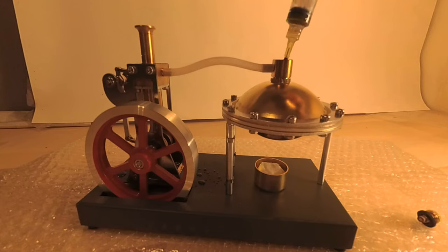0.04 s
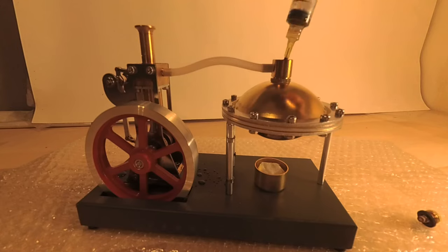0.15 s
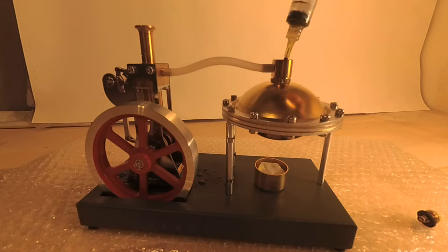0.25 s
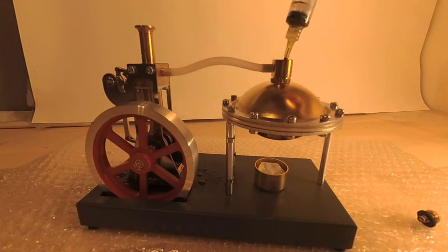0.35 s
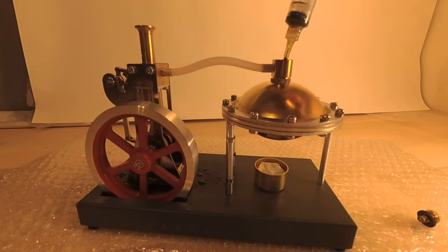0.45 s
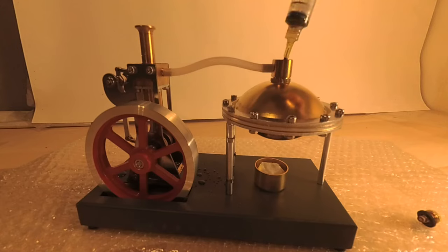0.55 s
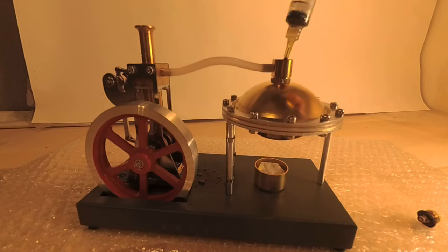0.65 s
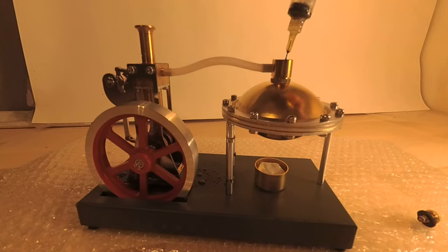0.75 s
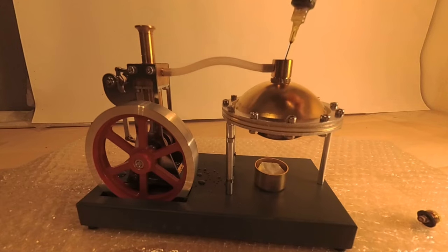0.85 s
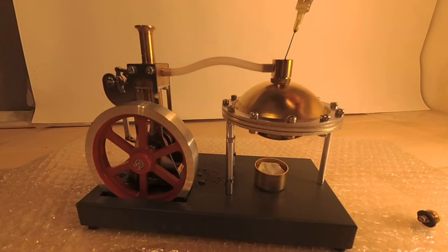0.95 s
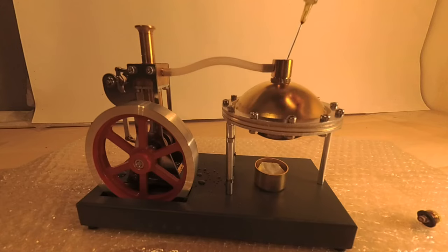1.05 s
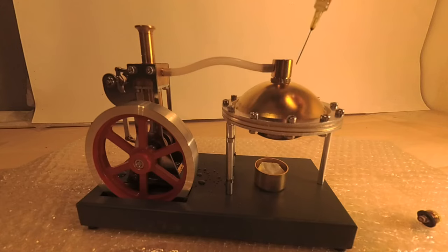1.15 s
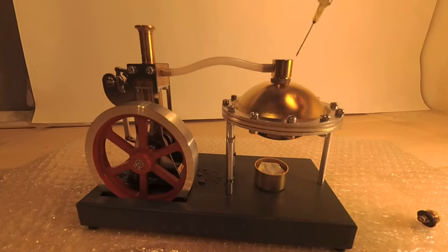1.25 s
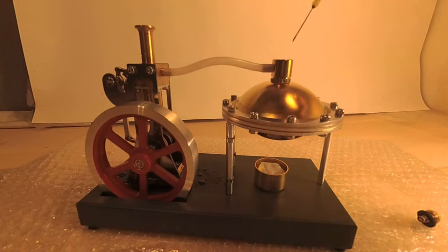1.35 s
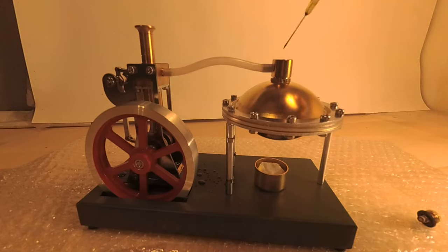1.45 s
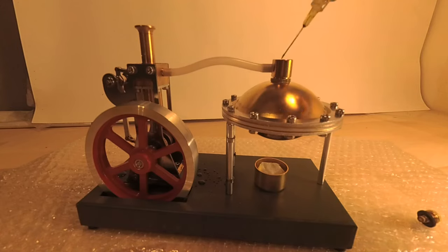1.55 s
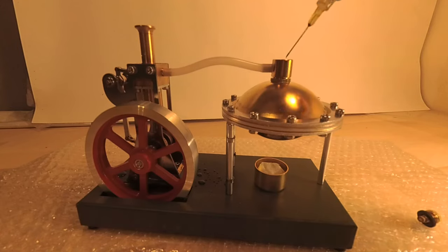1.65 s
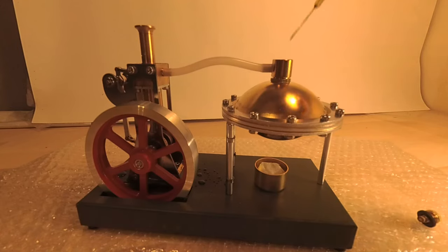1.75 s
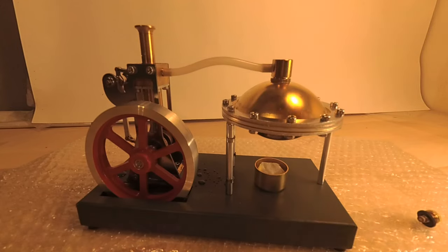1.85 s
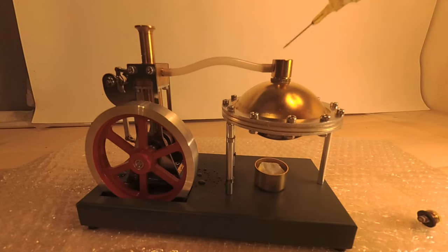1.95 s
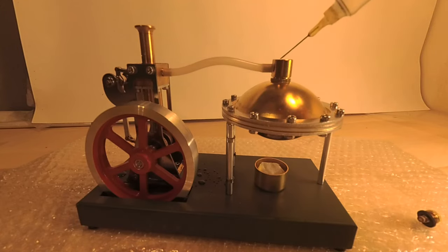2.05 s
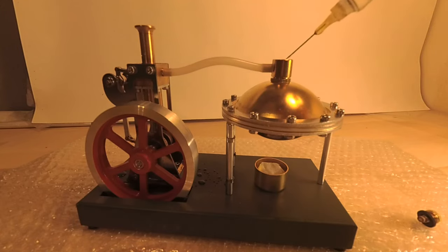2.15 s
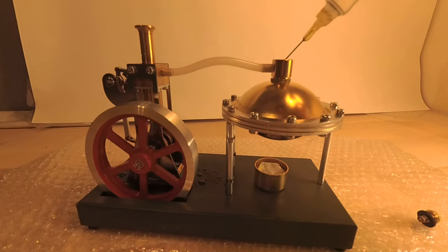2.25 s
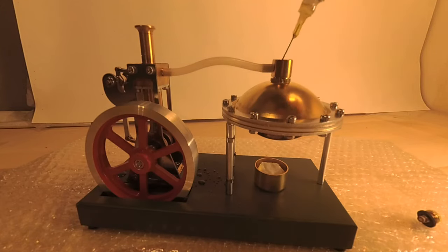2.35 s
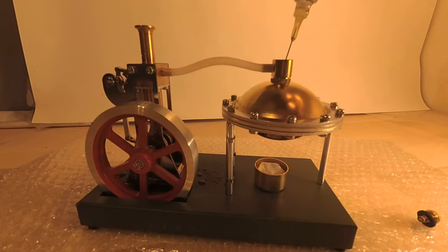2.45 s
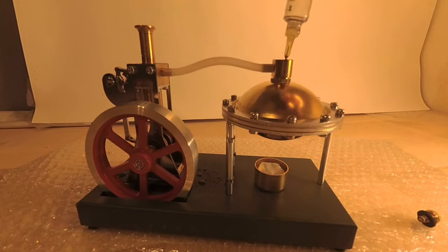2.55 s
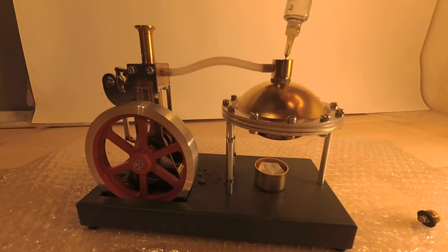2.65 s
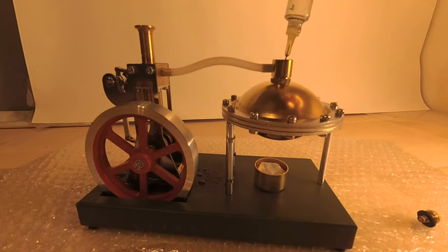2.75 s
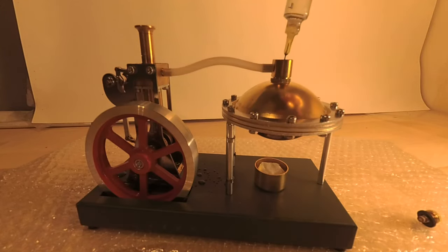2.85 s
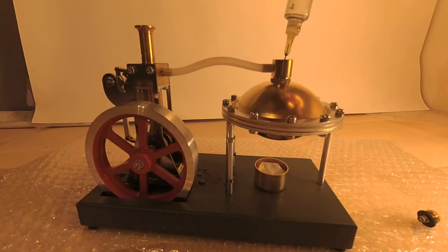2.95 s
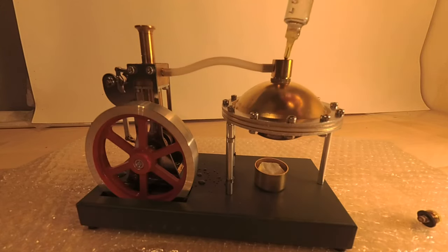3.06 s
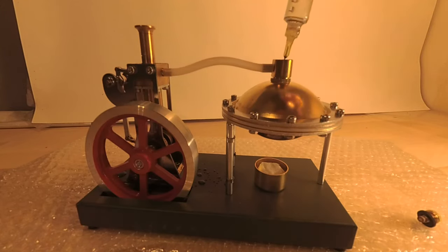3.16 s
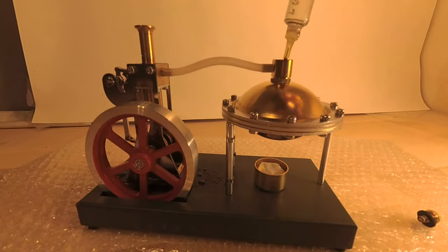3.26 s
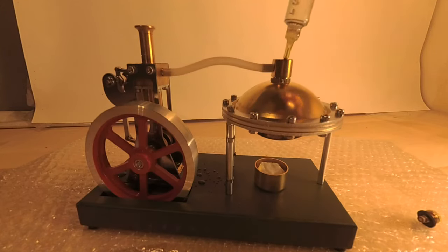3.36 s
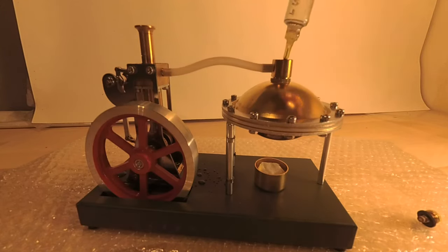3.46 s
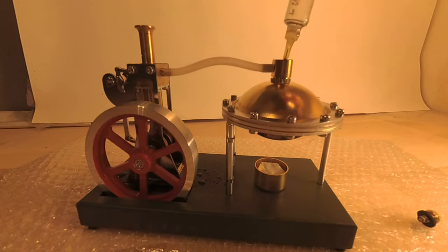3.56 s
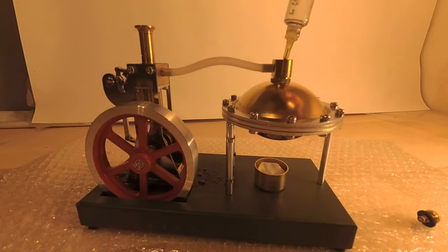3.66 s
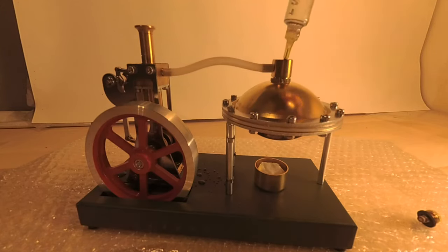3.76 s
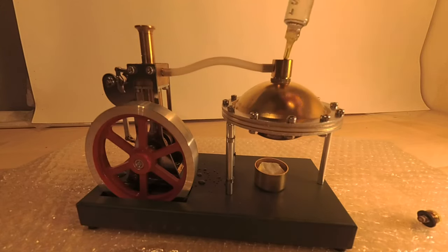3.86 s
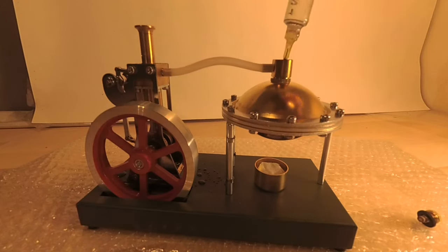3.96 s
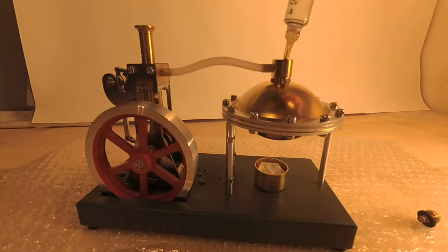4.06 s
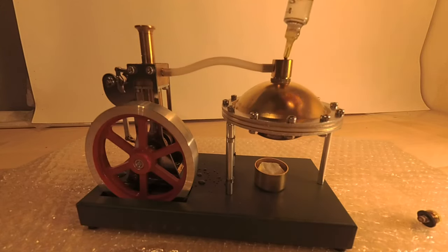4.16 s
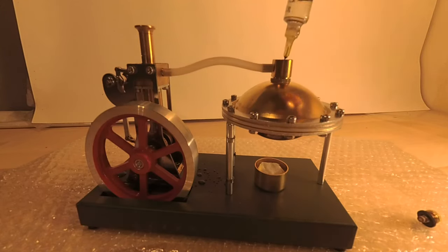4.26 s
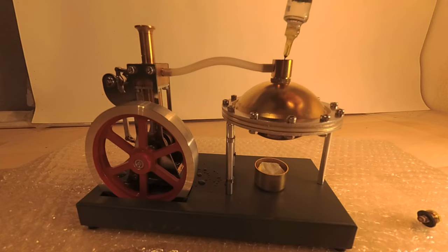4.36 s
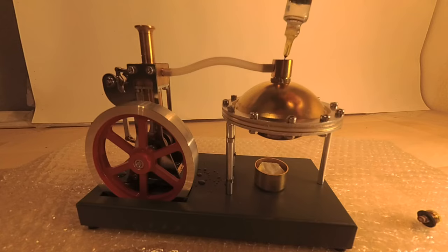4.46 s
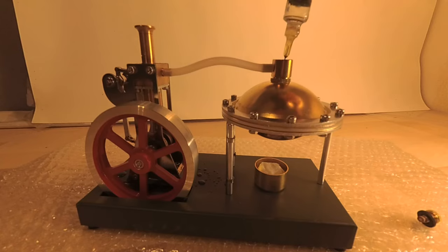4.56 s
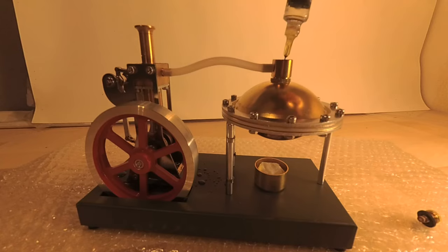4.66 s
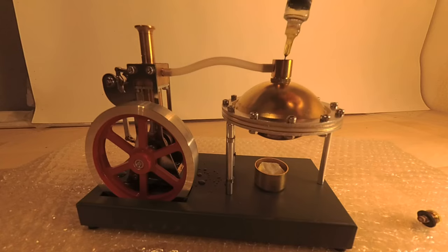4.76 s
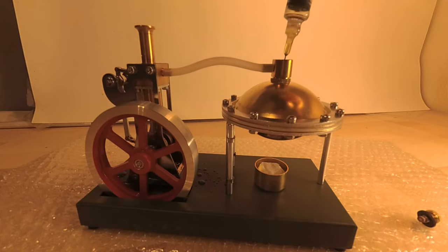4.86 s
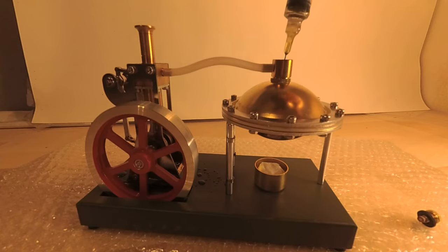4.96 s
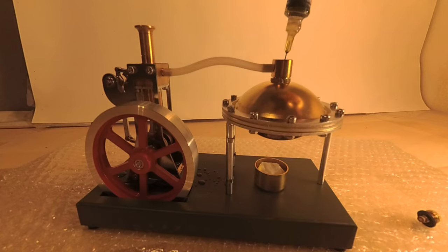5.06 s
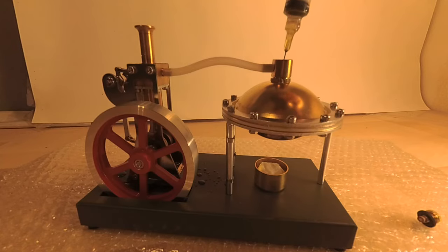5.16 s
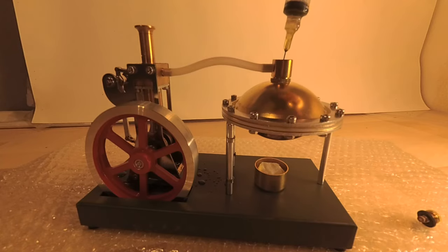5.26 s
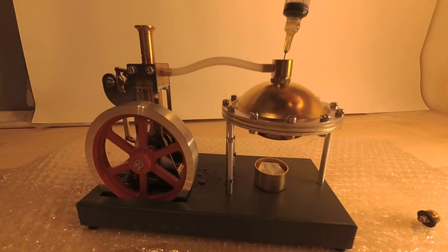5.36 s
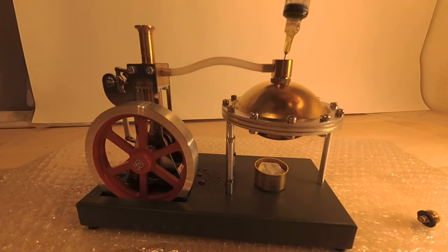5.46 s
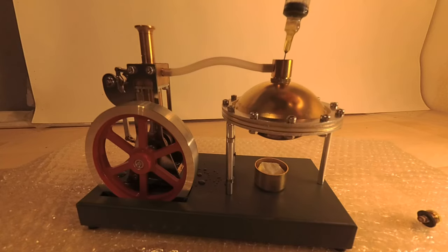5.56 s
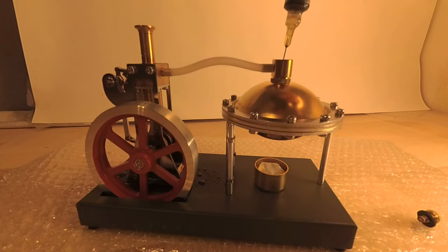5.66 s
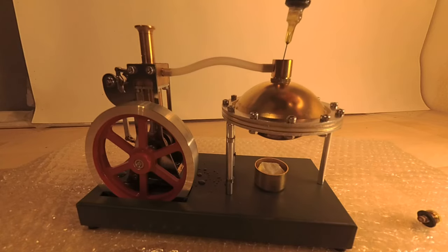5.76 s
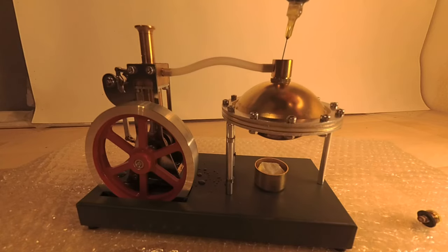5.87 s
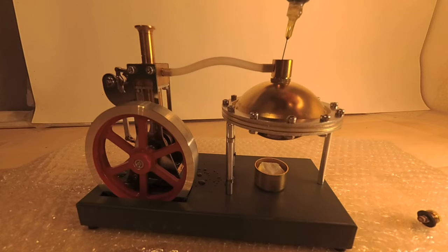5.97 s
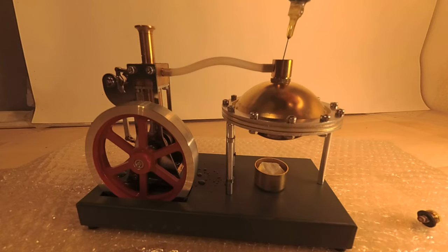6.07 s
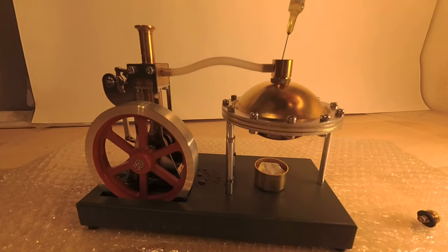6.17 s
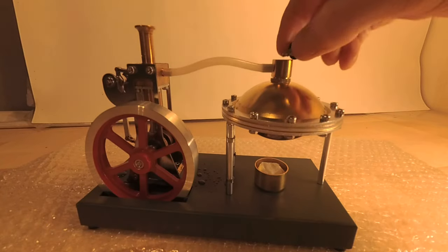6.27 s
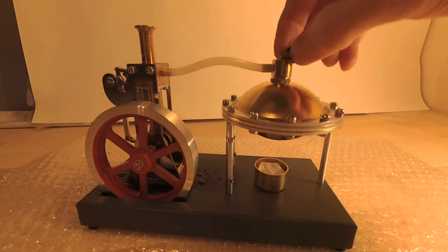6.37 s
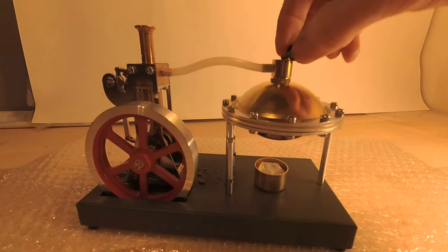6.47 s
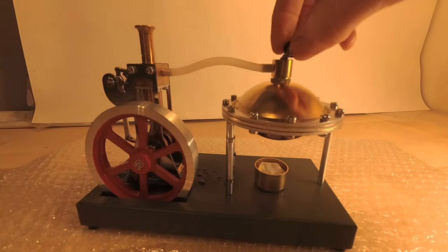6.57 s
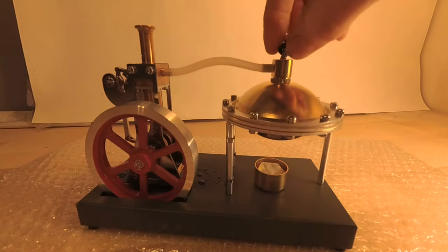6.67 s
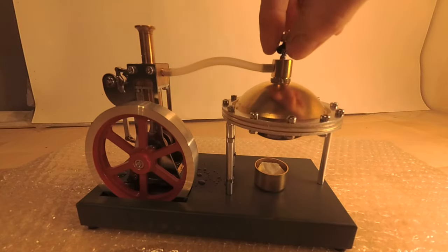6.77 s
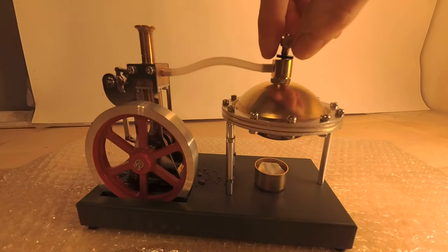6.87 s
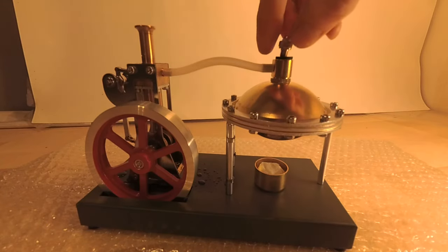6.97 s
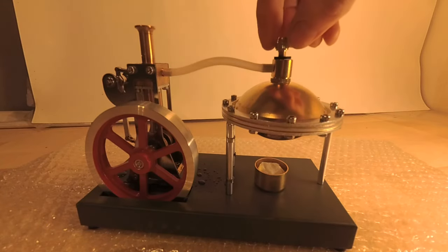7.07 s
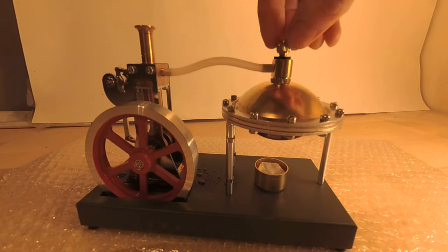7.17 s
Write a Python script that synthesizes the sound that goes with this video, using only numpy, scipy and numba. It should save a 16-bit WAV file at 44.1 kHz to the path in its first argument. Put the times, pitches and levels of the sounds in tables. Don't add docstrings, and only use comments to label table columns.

```python
import sys
import numpy as np
from scipy import signal
from scipy.fft import rfft, irfft
from scipy.io import wavfile
from scipy.ndimage import uniform_filter1d, minimum_filter1d
from numba import njit

SR = 44100
rng = np.random.default_rng(int(sys.argv[2]) if len(sys.argv) > 2 else 0)


def ratio_of_db(decibels):
    return 10 ** (np.asarray(decibels, float) / 20)


def pcm_store(signal):
    levels = np.round(np.clip(np.atleast_2d(signal), -1, 1) * 32767)
    wavfile.write(sys.argv[1], SR, levels.astype(np.int16).T)


N = 318181
T = np.arange(N) / SR

# [f/Hz, width/Hz, level/dB]
NECK_MODES = [(649, 15, 2), (562, 44.4, -10), (489, 39, -16), (717.6, 30, -17.5)]
# [f/Hz, width/Hz, level/dB]
SHELL_MODES = [(986.8, 16.5, -2), (1071.5, 69, -5), (1105, 34, 0), (1162, 33.4, 0), (1246, 34, -13),
               (818, 44, -23.5)]
# [f/Hz, width/Hz, level/dB]
UPPER_MODES = [(1443, 11, -9.5), (1662, 17, -3.5), (1792, 36, 3), (1904, 11.2, 4.5), (1964, 29, 0.5),
               (2127, 30.4, -0.5), (2460, 65, -8), (2598, 25, -8.5), (2930, 27, -9)]
# [f/Hz, width/Hz, level/dB]
NOZZLE_BANDS = [(15190, 2200, 1.5), (13600, 2000, -6.5)]


def level(x, db=0):
    return x * ratio_of_db(db) / np.sqrt(np.mean(x ** 2))


@njit
def svf(x, hz, width):
    y, b, l, g, k = np.empty(len(x)), 0., 0., 0., 0.
    for i in range(len(x)):
        if i % 16 == 0:
            g, k = np.tan(np.pi * hz[i] / SR), width / hz[i]
        v = (b + g * (x[i] - l)) / (1 + g * (g + k))
        b, l, y[i] = 2 * v - b, l + 2 * g * v, k * v
    return y


def ring(x, modes, bend=1, vary_db=0):
    gain = ratio_of_db(vary_db * rng.standard_normal(len(modes)))
    pitch = np.ones(len(x)) * bend
    out = 0
    for k, (hz, width, db) in enumerate(modes):
        out = out + (-1) ** k * gain[k] * ratio_of_db(db) * svf(x, hz * pitch, 1. * width)
    return out


def walk(rate):
    hold = int(SR / rate)
    steps = np.repeat(rng.standard_normal(N // hold + 1), hold)
    return 0.57 * uniform_filter1d(uniform_filter1d(steps, hold), hold)[:N]


def add(out, s, x, db):
    i = int(s * SR)
    out[i:i + len(x)] += (x * ratio_of_db(db) / np.abs(x).max())[:N - i]


def burst(t60, crackle_db, click=4.76, size=8000):
    t = np.arange(size) / SR
    grains = ratio_of_db(crackle_db * np.repeat(rng.standard_normal(size // 20), 20))
    force = rng.standard_normal(size) * grains * np.exp(-np.log(1000) * t / max(t60, .002))
    force[0] = click
    return force


def droplets(flicker_db, rate, grain_db):
    return rng.standard_normal(N) * ratio_of_db(flicker_db * walk(rate) + grain_db * walk(400))


def plunger():
    # [t/s, flow/dB, aim/dB]
    presses = [
        [(0.0, -58, -7), (0.1, -57.5, -5), (0.14, -56.5, -6.5), (0.27, -53.5, -6), (0.3, -55, -3),
         (0.352, -56.5, -5), (0.396, -83, 4)],
        [(2.6, -63, -9), (2.67, -52.5, 2.5), (2.87, -50, -6), (3.1, -52, -1), (3.3, -55, 3), (3.55, -52, -1.5),
         (4.65, -54, -0.5), (5.37, -53.5, 0), (5.415, -65, -8)],
    ]
    flow, aim = np.full(N, -200.), np.zeros(N)
    for s, flow_db, aim_db in map(np.transpose, presses):
        on = (T >= s[0]) & (T <= s[-1])
        flow[on] = np.interp(T[on], s, flow_db)
        aim[on] = np.interp(T[on], s, aim_db)
    return flow, aim


def nozzle_hiss(drops, fill):
    # [f/Hz, width/Hz, level/dB]
    nozzle_low = [(11140, 240, -20.5), (12750, 2170, -6)]
    thinning = ratio_of_db(-1.5 * (T - 4.0) * (T > 1))
    return level(ring(drops, NOZZLE_BANDS) + thinning * ring(drops, nozzle_low, fill))


def spray(drops, fill):
    # [f empty/Hz, width/Hz, level/dB]
    air_modes = [(5500, 680, -14.5), (6440, 400, -9.5), (7970, 440, 1.5), (8800, 480, -6.5),
                 (10180, 480, 1.5), (2650, 1300, -0.5)]
    mist = ring(droplets(3.4, 33, 0.64), [(7100, 23000, 0)])
    ridge = level(ring(drops, [(6680, 140, 0)]), -10.5) * ratio_of_db(2.5 * (T - 4))
    return level(ring(drops, air_modes, fill)) + level(mist, -1.1) + ridge


def shell_drum(fill):
    drum = droplets(1.2, 30, 1.8)
    lowest = ratio_of_db(0.5 * (T + 2.5) * (T > 1)) * ring(drum, SHELL_MODES[:1])
    others = ring(drum, SHELL_MODES[1:], (fill / 1.042) ** -0.2)
    upper = level(ring(drum, UPPER_MODES, 1 + 0.0396 * (T < 1)), -10.0)
    return level(lowest - others) + upper * ratio_of_db(10.3 * (T < 1) + 3.1 * (T > 4.14))


def spits(out):
    # [t/s, peak level/dB]
    spit_times = [(0.0308, -41), (0.2114, -24), (0.2922, -16), (2.6656, -19.5), (3.1222, -25),
                  (3.445, -21.5), (3.5213, -24), (3.5732, -41), (3.8027, -27), (4.198, -22.5),
                  (4.2265, -24), (4.4023, -24), (4.511, -39), (4.7386, -26), (4.9441, -29), (4.999, -24),
                  (5.0613, -27), (5.198, -24)]
    for s, db in spit_times:
        spit = ring(burst(0.068, crackle_db=-5.5), NOZZLE_BANDS + [(8060, 2100, -13.5)])
        add(out, s, spit, db - 14.5)


def jet():
    # [t/s, pitch factor]
    filling = [
        (0, 1.01),
        (2.6, 0.96),
        (5.4, 1.077),
    ]
    flow, aim = plunger()
    surge_db, surge_per_s = 3.5, 18
    surge = [surge_db * walk(surge_per_s) for _ in range(3)]
    empty_s, gasp_s = (0.373, 6.6), 0.019
    gasp = 7 * sum(np.exp(-((T - s) / gasp_s) ** 2) for s in empty_s)
    fill = np.interp(T, *np.transpose(filling))
    drops = droplets(2.6, 40, 4.6)
    out = ratio_of_db(flow + surge[0]) * nozzle_hiss(drops, fill)
    out += ratio_of_db(flow - 11.5 + gasp + 0.26 * surge[0]) * spray(drops, fill)
    out += ratio_of_db(flow + aim + surge[1]) * shell_drum(fill)
    neck_db = flow + aim - 4 - 0.82 * (T - 5.0) + surge[2]
    out += ratio_of_db(neck_db) * level(ring(droplets(6.2, 24.89, 0.54), NECK_MODES))
    spits(out)
    return out


def splashes():
    # [t/s, peak level/dB, f/Hz]
    early_drops = [
        (0.0447, -71, 1185),
        (0.0763, -67, 1160),
        (0.109, -63, 1180),
        (0.1305, -48.5, 1167),
        (0.18, -55, 1130),
        (0.2476, -45, 1160),
        (0.2959, -52, 1118),
        (0.3264, -49, 1190),
    ]
    # [t/s, peak level/dB, f/Hz]
    late_drops = [(2.6886, -39, 1077), (2.7205, -38, 1174), (2.784, -60, 1234), (2.8103, -51, 1105),
                  (2.864, -59, 1160), (2.9782, -51, 1170), (3.003, -38.5, 1189), (3.0622, -45, 1156),
                  (3.1134, -45, 1168), (3.1373, -35.5, 1197), (3.1743, -41.5, 1102), (3.211, -42, 1090),
                  (3.2943, -46, 1154), (3.3148, -36, 1110), (3.3555, -38, 1087), (3.4405, -40.5, 1234),
                  (3.531, -48, 1180), (3.555, -43, 1080), (3.594, -44.5, 1139), (3.612, -47, 1187),
                  (3.659, -40.5, 1188), (3.6975, -38, 1110), (3.763, -41.5, 1168), (3.7973, -34.5, 993),
                  (3.8336, -38, 958), (3.8666, -55, 1210), (3.8938, -54, 1110), (3.9444, -40, 1073),
                  (3.993, -56, 1150), (4.0335, -47, 1210), (4.0543, -44.5, 1160), (4.09, -39.5, 1144),
                  (4.114, -35.5, 1090), (4.1399, -43, 1057), (4.2027, -40, 1192), (4.2505, -41, 1158),
                  (4.3506, -38.5, 1160), (4.3896, -40, 1144), (4.42, -39.5, 1120), (4.4748, -42.5, 1078),
                  (4.4968, -38, 1110), (4.561, -38, 1137), (4.599, -37.5, 1120), (4.6328, -44, 1010),
                  (4.663, -40.5, 1122), (4.7135, -40.5, 1184), (4.8127, -53, 996), (4.8399, -49, 1080),
                  (4.872, -46, 1150), (4.9327, -54, 1105), (4.9532, -43.5, 1007), (5.0184, -41, 1143),
                  (5.084, -39, 1122), (5.1516, -46, 987), (5.203, -39, 1010), (5.3028, -41, 1105)]
    # [t/s, peak level/dB]
    gulps = [(2.632, -51), (2.775, -66), (2.812, -46), (2.875, -45.5), (2.965, -41), (3.053, -46.5),
             (3.121, -49), (3.4, -47), (3.451, -51), (3.777, -72), (3.832, -52), (3.999, -60), (4.071, -70),
             (4.109, -51), (4.162, -70), (4.221, -54), (4.271, -48), (4.368, -60), (4.406, -50),
             (4.519, -44), (4.649, -41), (4.716, -41.5), (4.78, -52.5), (4.878, -51.5), (4.95, -57),
             (5.014, -52), (5.05, -48), (5.087, -41), (5.153, -55), (5.196, -65), (5.231, -39.5),
             (5.333, -45)]
    out = np.zeros(N)
    rows = [(*row, 49) for row in early_drops + late_drops]
    rows += [(*row, 643, 29) for row in gulps]
    lead_s = 0.003068
    for s, db, hz, width, in rows:
        hit = burst(0.01, crackle_db=3.5, size=3000)
        mode = [(hz, width, 0)]
        swell = ring(ring(hit, mode), mode)
        add(out, s - lead_s, swell + ratio_of_db(-28) * ring(hit, UPPER_MODES), db - 3)
    return out


def needle_rub():
    # [middle t/s, length/s, shell level/dB, neck level/dB, scrape level/dB]
    strokes = [(0.8, 0.14, -78, -75, -83), (0.865, 0.24, -73, -70, -69), (1.024, 0.32, -68, -76, -59),
               (1.194, 0.18, -73, -65.5, -64), (2.277, 0.17, -78.5, -76, -81), (2.474, 0.48, -84, -69, -82),
               (2.615, 0.16, -76, -73, -79), (5.47, 0.43, -76.5, -71, -76), (5.777, 0.29, -70, -70, -67.5),
               (5.974, 0.13, -66.5, -67.5, -66), (6.114, 0.25, -74.5, -66, -77),
               (6.212, 0.39, -73, -71.5, -71), (6.546, 0.33, -70.5, -70.5, -84),
               (6.807, 0.57, -79, -79, -83), (6.94, 0.14, -66, -51.5, -82), (7.082, 0.16, -60.5, -58, -71),
               (7.174, 0.19, -69.5, -62.5, -79)]
    middle, length, *parts_db = np.transpose(strokes)
    progress = np.clip((T - middle[:, None]) / length[:, None], -.5, .5)
    swell = np.cos(np.pi * progress) ** 2
    shell, neck, scrape = ratio_of_db(np.array(parts_db)) @ swell
    grit, breeze = droplets(7.6, 30, 4.4), droplets(2.6, 20, 1.1)
    out = neck * level(ring(breeze, NECK_MODES))
    out += shell * (level(ring(grit, SHELL_MODES)) + level(ring(grit, UPPER_MODES), 0.056))
    return out + scrape * level(ring(grit, [(6700, 69000, 24), (14000, 4100, -22)]))


def needle_ticks():
    # [t/s, peak level/dB, f/Hz, t60/s]
    sputters = [(0.288, -38, 7950, 0.023), (0.297, -29.5, 9550, 0.012), (0.312, -39, 9000, 0.06),
                (0.3342, -38, 9500, 0.028), (0.852, -37, 8300, 0.02), (0.858, -47.5, 7000, .12),
                (1.169, -30.5, 6400, 0.064), (1.186, -38, 8000, 0.03), (1.199, -55, 8000, .02),
                (1.825, -48, 4270, 0.12), (2.4842, -39, 8800, 0.016), (2.617, -41.5, 12300, 0.02),
                (3.422, -44, 4270, 0.074), (5.3317, -16, 14000, 0.045), (5.3475, -21, 9800, 0.025),
                (5.359, -35, 13200, 0.041), (5.556, -34, 4660, 0.021), (5.661, -47.5, 15400, 0.082),
                (6.179, -46.5, 4730, 0.12), (6.183, -45, 7600, 0.13), (6.5126, -45, 5170, 0.03),
                (6.747, -50.5, 5710, .035), (6.773, -48, 2870, 0.036), (6.904, -36, 15100, 0.076),
                (6.925, -46, 4970, 0.044)]
    # [t/s, peak level/dB, f/Hz]
    clicks = [(0.64, -57, 7000), (1.4754, -54, 13500), (1.8968, -40, 11200), (2.064, -45.5, 5000),
              (2.1652, -41.5, 6200), (2.2106, -45.5, 5500), (2.252, -39.5, 5940), (2.336, -45, 7250),
              (2.3507, -44, 6600), (5.3357, -24, 13000), (5.5286, -36.5, 8730), (5.5521, -36, 9180),
              (6.116, -39, 6580), (6.1246, -37.5, 8900), (6.1503, -33.5, 4220), (6.2642, -46, 8960),
              (6.3065, -37.5, 13600), (6.4074, -41.5, 13100), (7.0386, -57, 13400)]
    # [t/s, peak level/dB, f/Hz]
    pings = [
        (0.6749, -56, 8400),
        (0.743, -49.5, 6350),
        (1.137, -50, 3900),
        (1.241, -46.5, 2860),
        (6.186, -43, 7700),
        (6.3065, -45.5, 3760),
        (6.3182, -48.5, 5500),
    ]
    out = np.zeros(N)
    ticks = [(*row, 2.03) for row in sputters]
    ticks += [(*row, 0.0048, 2.6) for row in clicks]
    ticks += [(*row, 0.024, 0.29) for row in pings]
    for s, db, hz, t60, octaves in ticks:
        band = [(hz, hz * octaves * 0.79, 0), (14200, 3000, -2)]
        force = burst(t60, crackle_db=2.5, size=4000)
        add(out, s, ring(ring(force, band), band), db)
    return out


def cap_thread():
    # [t/s, peak level/dB, neck share/dB, upper shell share/dB, cap level/dB]
    knocks = [(6.409, -34.5, -10.5, -13, -55.5), (6.509, -46.5, -21, -5, -54),
              (6.515, -33, -11, -13, -48.5), (6.527, -39.5, -43, -8, -55), (6.551, -35, -15.5, -20, -73),
              (6.664, -54.5, -18, -20, -72), (6.685, -57, -14, -25, -72), (6.709, -39, -9, -21, -65),
              (6.7192, -43, -1, -13, -63), (6.750, -36.5, -7, -32, -69), (6.757, -35.5, 2.5, -25, -61),
              (6.781, -31, -1.5, -17.5, -61), (6.8, -35, 4.5, -27, -53), (6.839, -45.5, -0.5, -13, -70),
              (6.865, -46.5, -23, -18, -70), (6.898, -39, -10, -25, -56), (6.906, -25.5, -14, -39, -48),
              (6.915, -41, -11, -27, -47), (6.927, -26.5, -11, -30, -35.5), (6.944, -42, -5, -6, -56),
              (7.012, -52, 0, -10, -56), (7.04, -34, -15, -17, -44.5), (7.061, -37, 2, -11, -54),
              (7.073, -46, 9, -6, -62), (7.0804, -46, -16, -13, -49), (7.091, -33.5, -11, -30, -51),
              (7.119, -41.5, -10, -23, -46.5), (7.144, -46, -28, -23, -59), (7.1696, -48, -10, -23, -55),
              (7.208, -37.5, -40, -37, -51)]
    # [f/Hz, width/Hz, level/dB]
    cap_modes = [(4120, 25, -6), (4650, 70, 2), (4840, 70, 1), (4940, 220, 1), (5210, 76, -0.5),
                 (6100, 40, -8), (4900, 1100, -11.5), (8150, 180, -14), (9800, 210, -30),
                 (13600, 1950, -10.5)]
    out = np.zeros(N)
    shell = SHELL_MODES[1:] + [(1285, 21.4, 0.0), (994, 6.2, -18)]
    neck = NECK_MODES[::3] + [(567, 24, -18.0), (730, 54, -10)]
    for s, db, neck_db, upper_db, cap_db in knocks:
        hit = burst(.01, crackle_db=12.0, click=24.6)
        add(out, s, ring(hit, cap_modes, vary_db=3), cap_db + 1)
        push = uniform_filter1d(np.roll(hit, 8), size=14)
        parts = ((shell, -5.5), (neck, neck_db - 0.5), (UPPER_MODES, upper_db + 4.0))
        for modes, share_db in parts:
            add(out, s - .002, ring(push, modes, vary_db=1.5), db + share_db)
        scrape = ring(burst(0.22, crackle_db=6.5), [(1310, 350, 0)] + UPPER_MODES[1:6])
        add(out, s, scrape, db - 13.5)
    return out


def bumps():
    # [t/s, peak level/dB, f/Hz, boiler ring share/dB]
    full_bumps = [(0.291, -41, 1120, -6), (0.85, -53, 726, -7), (1.159, -49, 1020, -6),
                  (1.188, -46.5, 2070, -6), (2.255, -49, 1310, -17), (2.34, -33.5, 667, -18.5),
                  (2.482, -36, 1320, -16), (2.483, -49.5, 1800, -5), (2.612, -47, 1700, 5.5),
                  (5.331, -47, 660, 8.5), (5.349, -39.5, 1090, 1.5), (5.672, -53, 690, -8.5),
                  (6.117, -48.5, 790, 4), (6.127, -45, 1050, -17), (6.104, -51.5, 730, -4),
                  (6.189, -42, 2290, -9), (6.176, -40, 750, -16), (1.826, -37.5, 730, -13),
                  (6.904, -42, 1160, 11.5)]
    # [t/s, peak level/dB, f/Hz]
    glances = [(0.675, -51.5, 740), (0.744, -46.5, 800), (1.136, -46, 1580), (1.238, -49.5, 1350),
               (1.827, -38, 1330), (1.861, -43.5, 1180), (0.989, -53.5, 600), (2.068, -43, 1310),
               (5.528, -43, 2170), (5.551, -36.5, 2160), (6.150, -42, 1880), (6.264, -52, 1300)]
    out = np.zeros(N)
    rows = [(*row, 0.046) for row in full_bumps]
    rows += [(*row, -23, 0.045) for row in glances]
    for s, db, hz, ring_db, t60 in rows:
        band = [(hz, hz * 0.5, 0)]
        hit = ring(ring(burst(t60, crackle_db=3.5), band), band)
        add(out, s, hit, db - 6.0)
        add(out, s, ring(hit, NECK_MODES + SHELL_MODES + UPPER_MODES), db - 0.5 + ring_db)
    return out


def table_thumps():
    # [t/s, peak level/dB, f/Hz]
    thumps = [(0.291, -64, 232), (0.987, -57, 252), (1.234, -62.5, 298), (1.824, -51.5, 302),
              (2.334, -76, 417), (2.771, -56.5, 220), (3.413, -60, 334), (3.418, -47, 806),
              (6.777, -55, 444), (6.912, -73, 398), (7.068, -58, 420)]
    out = np.zeros(N)
    for s, db, hz in thumps:
        force = burst(0.13, crackle_db=2.5, click=6.0)
        add(out, s, ring(force, [(hz, hz * 0.21, 0), (90, 90, -14), (1200, 1200, -22)]), db + 1.0)
    return out


def echo(x, t60, low_hz):
    t = np.arange(SR // 2) / SR
    tail = rng.standard_normal((2, len(t))) * np.exp(-np.log(1000) * t / t60)
    tail = signal.sosfilt(signal.butter(2, low_hz, "high", fs=SR, output="sos"), tail)
    tail = tail / np.sqrt(np.sum(tail ** 2, axis=1, keepdims=True))
    return signal.fftconvolve(x[None], tail, axes=1)[:, :N]


def room_floor():
    # [f/Hz, level/dB per Hz]
    air_spectrum = [(25, -23), (100, -13.5), (160, -14.5), (400, -11), (1430, -14.5), (8490, -18.5),
                    (14600, -16), (15800, -15)]
    # [f/Hz, correlation]
    likeness = [(30, 0.23), (200, 0.15), (1500, 0.28), (4000, 0.06), (15000, 0.025)]
    # [f/Hz, rms level/dB]
    mains = [(120, -84.5), (240, -92.5)]
    log_f = np.log(np.maximum(np.fft.rfftfreq(N, 1 / SR), 1))
    hz, db = np.transpose(air_spectrum)
    shape = ratio_of_db(np.interp(log_f, np.log(hz), db))
    hz, alike = np.transpose(likeness)
    c = np.clip(np.interp(log_f, np.log(hz), alike), 0, 1)
    mid, side = rfft(rng.standard_normal((2, N))) * shape
    mid, side = np.sqrt(1 + c) * mid, np.sqrt(1 - c) * side
    air = irfft(np.array([mid + side, mid - side]), N)
    hum = sum(ratio_of_db(db + 0.41 * walk(1.64)) * np.sqrt(2) * np.sin(2 * np.pi * hz * T) for hz, db in mains)
    return level(air, -65.0) + hum


def scene():
    water = jet()
    touch = needle_rub() + needle_ticks() + cap_thread() + bumps() + table_thumps() + splashes()
    near = water + touch
    room = ratio_of_db(-10.5) * echo(near, 0.3, low_hz=1000)
    metal = ratio_of_db(-1.5) * (echo(touch, .03, low_hz=5170) + echo(water, .12, low_hz=5170))
    pan_db = np.array([[-2.6], [2.6]])
    return ratio_of_db(pan_db / 2) * (near + room + metal) + room_floor()


def slip(z, f, t, hold_s=.15, gain_db=2.0):
    # [from t/s, low f/Hz, high f/Hz, left lead/rad]
    held_tones = [(1.7, 60, 200, 0), (1.92, 60, 200, 2.5), (2.92, 60, 200, .5), (3.3, 60, 200, 2.4),
                  (2.2, 480, 800, .6), (2.5, 480, 800, 1.3), (2.82, 480, 800, -2.6), (3.75, 480, 800, -1.9),
                  (2.5, 940, 1040, 2.9), (2.5, 1080, 1190, .3), (2.82, 1080, 1190, 2.6),
                  (2.97, 1080, 1190, -.4), (3.3, 1080, 1190, 2.4), (3.56, 1060, 1250, -.5)]
    bins = np.arange(len(f))
    band = np.minimum(bins // 2, 18 + bins // 5)
    draw = rng.random((2, 2, band[-1] + 1, len(t)))
    renew = draw[0] < (t[1] / hold_s) * (1 + np.arange(band[-1] + 1)[:, None] / 20)
    last = np.maximum.accumulate(renew * np.arange(len(t)), axis=2)
    cycles = np.take_along_axis(draw[1], last, axis=2)
    cycles[1] = cycles[0] + .5 * (cycles[1] > .5)
    turn = ratio_of_db(gain_db) * np.exp(2j * np.pi * cycles[:, band])
    for s, lo, hi, lead in held_tones:
        tone = ((f > lo) & (f < hi))[:, None] & (t >= s)
        turn[:, tone] = np.exp(1j * np.array([[lead], [0]]))
    sped_up = (t > 1.905) & (t < 4.14)
    return np.where(sped_up, z * turn, z)


def drop_weak_bands(z, f, under_db):
    power = uniform_filter1d(np.sum(np.abs(z) ** 2, axis=0), size=17, axis=1)
    bands = power[:512].reshape(128, 4, -1).sum(axis=1)
    held = (np.arange(len(power[0])) // 4 + rng.integers(0, 3, (128, 1))) // 3
    luck = np.take_along_axis(rng.standard_normal((128, held.max() + 1)), held, axis=1)
    quietest_treble = minimum_filter1d(power[f > 11000].sum(axis=0), size=13)
    need = quietest_treble * ratio_of_db(2 * under_db - 5 * (f[:512:4, None] > 6600))
    keep = 1. * (bands * ratio_of_db(7 * luck) > need)
    keep[1:] = np.maximum(keep[1:], (1 - keep[:-1]) * (luck[1:] > 0))
    keep[:16], keep[60:89] = True, True
    treble = np.sum(np.abs(z[:, f > 11000]) ** 2, axis=(0, 1))
    click = treble > 5 * signal.medfilt(treble, 31)
    keep[:, uniform_filter1d(1. * click, size=5) > 0] = 1
    keep[89:] = .1 * click
    return z * np.vstack([np.repeat(keep, 4, axis=0), keep[-1:]])


def band_limit(x):
    return signal.sosfilt(signal.butter(12, 16460, fs=SR, output="sos"), x)


def record(dry):
    f, t, z = signal.stft(dry, SR, nperseg=1024, noverlap=768)
    z = drop_weak_bands(slip(z, f, t), f, under_db=-29)
    edited = signal.istft(z, SR, nperseg=1024, noverlap=768)[1][:, :N]
    top_cut = signal.ellip(8, .2, 60, 16300, fs=SR, output="sos")
    return band_limit(signal.sosfilt(top_cut, edited))


dry = scene()
out = record(dry)
pcm_store(out)
```